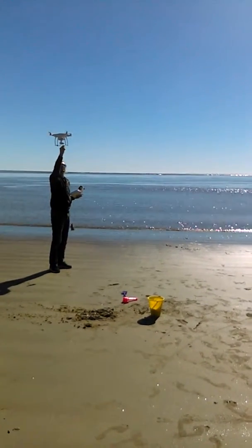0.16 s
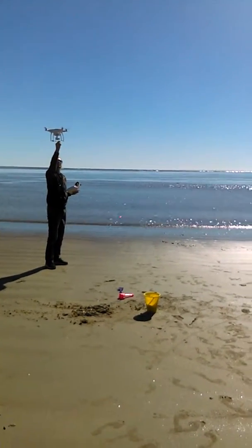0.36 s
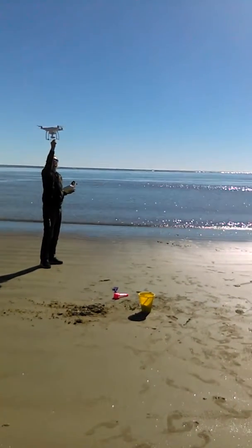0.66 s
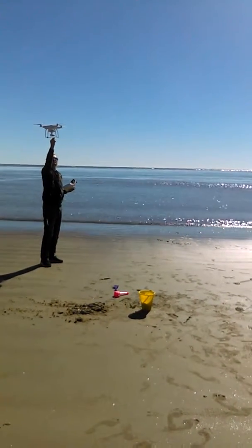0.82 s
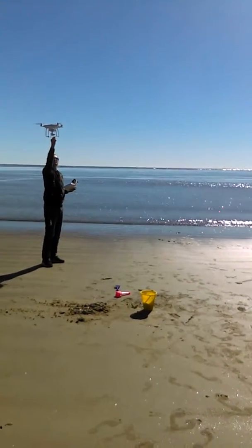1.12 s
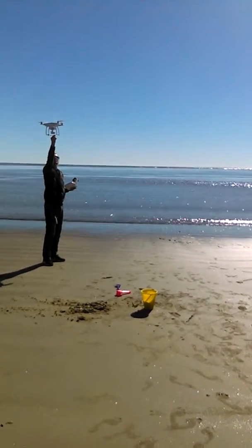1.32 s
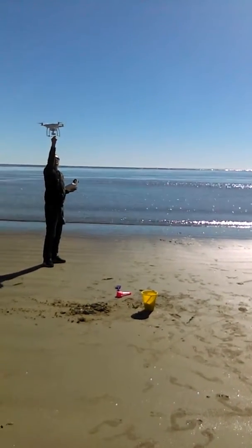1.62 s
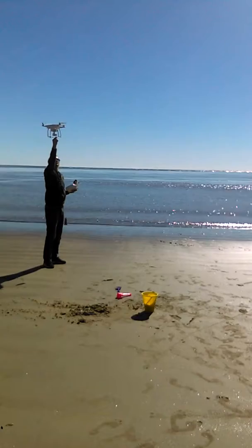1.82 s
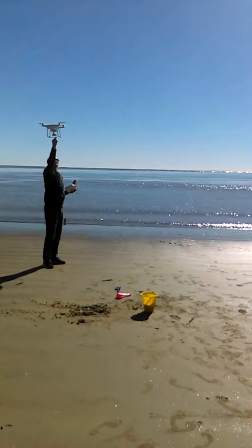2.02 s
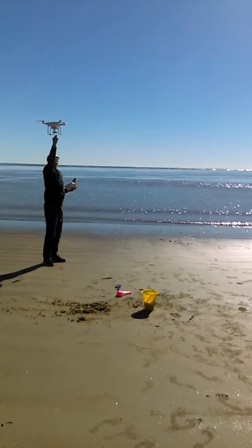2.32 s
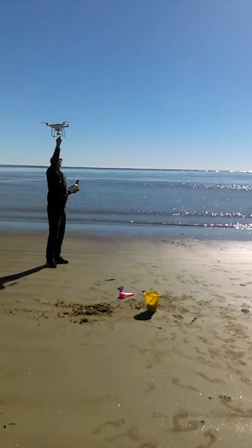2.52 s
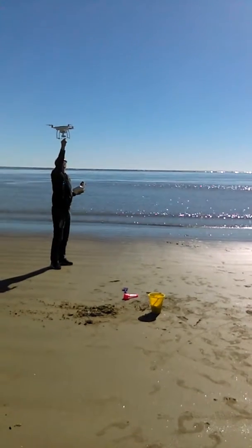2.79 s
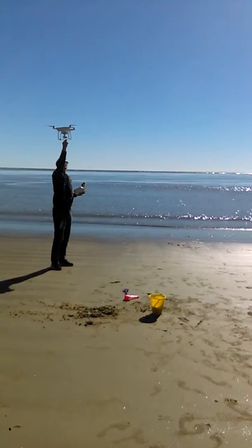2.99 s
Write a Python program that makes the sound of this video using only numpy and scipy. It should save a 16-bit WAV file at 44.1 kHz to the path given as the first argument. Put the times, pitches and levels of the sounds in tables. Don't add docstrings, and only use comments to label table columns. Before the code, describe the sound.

A small drone hovers a few metres away, its rotors buzzing with a thin high whine and airy hiss, while wind thumps the left side of the microphone, lulls midway, then gusts again on an open beach.

```python
import sys
import numpy as np
from scipy import signal
from scipy.fft import rfft, irfft, next_fast_len
from scipy.io import wavfile
from scipy.ndimage import uniform_filter1d, map_coordinates

SR = 44100
rng = np.random.default_rng(int(sys.argv[2]) if len(sys.argv) > 2 else 0)


def wav_out(sig):
    wavfile.write(sys.argv[1], SR, np.round(np.clip(np.atleast_2d(sig).T, -1, 1) * 32767).astype(np.int16))


def gain_from_db(level_db):
    decades = np.asarray(level_db, float) / 20
    return 10 ** decades


N = 138915


def unit(x):
    return x / np.sqrt(np.mean(x ** 2) + 1e-20)


def along(points, hz):
    f, v = np.transpose(points)
    return np.interp(np.log(hz + 1), np.log(f + 1), v)


def curves(rows):
    s, *cols = np.transpose(rows)
    return [np.interp(np.arange(N) / SR, s, c) for c in cols]


def wobble(rate):
    return map_coordinates(rng.standard_normal(400), [np.arange(N) * rate / SR])


def filtered(x, response):
    m = next_fast_len(N + SR // 2)
    return irfft(rfft(x, m) * response(np.fft.rfftfreq(m, 1 / SR)), m)[..., :N]


def resonance(hz, centre_hz, width_hz, db):
    return db / (1 + (2 * (hz - centre_hz) / width_hz) ** 2)


def bumps(s, size, width_s):
    k = np.arange(-800, 800)
    at = np.clip(np.round(s * SR).astype(int)[:, None] + k, -1, N) % (N + 1)
    bells = size[:, None] * np.exp(-(k / SR / width_s[:, None]) ** 2)
    return np.bincount(at.ravel(), bells.ravel(), N + 1)[:N]


def port(x):
    port_hz, q = 87.5, 0.99
    return filtered(x, lambda f: -f * f / (port_hz ** 2 - f * f + 1j * f * port_hz / q))


def eddies():
    # (frequency [Hz], level [dB])
    rumble_colour = [(15, -45), (45, 4), (110, 1.5), (250, -15), (600, -48.5)]
    eddies_per_s, typical_s, spread, smallest_s = 260, 0.0021, 1, 0.0008
    scatter_db, rumble_db = 0.5, 1.5
    u, g = rng.random((2000, 3)), rng.standard_normal(2000)
    s = np.cumsum(-np.log(1 - u[:, 0])) / eddies_per_s
    size = np.sign(u[:, 1] - .5) * gain_from_db(-scatter_db * np.log(1 - u[:, 2])) * (s < N / SR)
    width_s = np.maximum(typical_s * np.exp(spread * g), smallest_s)
    rumble = unit(filtered(rng.standard_normal(N), lambda f: gain_from_db(along(rumble_colour, f))))
    return unit(unit(port(bumps(s, size, width_s))) + gain_from_db(rumble_db) * rumble)


def strong_eddies(events):
    s, db, width_s, sign = np.transpose(events)
    return port(bumps(s, gain_from_db(db) * sign, width_s))


def wind():
    # (time [s], strength [dB])
    strength = [(0, -30), (.2, -30.5), (.35, -23.5), (.5, -26), (.65, -30), (.9, -24), (1.15, -29),
                (1.4, -26.5), (1.55, -31.5), (1.63, -41), (1.97, -42.5), (2.12, -29), (2.25, -35.5),
                (2.3, -17), (2.45, -29), (2.65, -31), (2.85, -26.5), (3.15, -37.5)]
    # (time [s], peak [dB])
    puff_events = [(.16, -27), (.185, -30.5), (.278, -25), (0.389, -30), (0.421, -19), (.476, -22),
                   (.506, -25.5), (0.576, -26), (0.719, -30), (0.779, -20.5), (0.823, -28), (0.97, -25),
                   (1.035, -29.5), (1.097, -25), (1.145, -26.5), (1.254, -32.5), (1.284, -27),
                   (1.427, -27.5), (1.444, -29), (1.523, -21.5), (1.6, -30.5), (2.417, -23.5), (2.47, -25),
                   (2.61, -28), (2.662, -29.5), (2.805, -25.5), (2.879, -33), (3.072, -30)]
    # (time [s], peak [dB], width [s], sign)
    thumps = [(0.118, -13, 0.00093, -0.93), (0.325, -11, 0.00081, -1.1), (0.469, -6, 0.00059, -0.74),
              (0.51, -17.5, 0.0025, 0.8), (.531, -19, 0.00063, -1.4), (0.59, -10.5, 0.0015, 0.96),
              (0.693, -14, 0.00076, -1.08), (0.916, -12, 0.00098, -1.45), (1.09, -13, 0.00082, -1.65),
              (1.351, -12, 0.00091, 1), (2.29, -4.5, 0.0032, 0.8), (2.317, -15, 0.00077, 0.78),
              (2.337, -14, 0.0011, 0.85), (2.351, -8, 0.0025, -0.77), (2.518, -16, 0.0012, -1.4),
              (2.754, -9, 0.0016, 0.69), (2.938, -13, 0.0017, 1)]
    # (time [s], peak [dB], width [s], sign)
    strays = [
        (2.002, -15.5, 0.0016, 1),
        (2.008, -16, 0.0023, 0.9),
        (2.014, -11.5, 0.0038, 1),
        (2.023, -12.5, 0.0028, 1),
        (2.15, -18.5, 0.0035, -1),
        (2.173, -19, 0.0021, -1.1),
        (2.186, -9, 0.0023, -0.91),
        (2.194, -15, 0.0012, -0.38),
        (2.204, -7.5, 0.0024, 0.64),
    ]
    between_db, gusty_db, puff_half_s = -2.5, 1, .007
    lee_db, lee_grows, lee_hz = -52.5, 0.094, 189
    strength_db, = curves(strength)
    s, db = np.transpose(puff_events)
    puffs = bumps(s, gain_from_db(db), np.full(len(s), puff_half_s))
    left = (gain_from_db(strength_db + between_db + gusty_db * wobble(15)) + puffs) * eddies()
    lee_level = lee_db + lee_grows * (strength_db - strength_db.mean()) + 5.1 * wobble(18)
    right = gain_from_db(lee_level) * filtered(eddies(), lambda f: 1 / (1 + 1j * f / lee_hz) ** 2)
    return np.array([left + strong_eddies(thumps), right + strong_eddies(strays)])


def tip_hiss(chop):
    # (frequency [Hz], level [dB])
    tip_colour = [(250, -28.5), (570, -21.5), (1100, -21.5), (1450, -25), (2400, -20), (4100, -29.5),
                  (10600, -22), (15500, -44.5)]
    # (frequency [Hz], left over right [dB])
    balance = [(60, 42.5), (110, 41), (200, -33), (420, 12), (700, -7), (1290, 10), (2380, -2), (4400, 6.5),
               (8120, -3), (15000, -19.5)]
    # (frequency [Hz], left lead [rad])
    phase_leads = [(0, -7), (3530, 3.5), (5430, -4), (6900, -18.5), (7650, -22), (9130, -25.5), (9910, -43),
                   (12500, -42.5), (13300, -68), (15200, -84)]
    # (frequency [Hz], share common to both ports)
    common = [(300, 0.72), (2000, 0.068), (6000, 0.2), (14000, 0.63)]
    # (frequency [Hz], width [Hz], gain [dB])
    shell = [
        (3760, 210, 3.5),
        (4090, 125, -8),
        (5340, 160, 7),
        (5574, 120, 10.5),
        (5824, 75, 12),
        (6870, 220, -5.5),
    ]
    hiss_db, chop_depth, patchy_db = -45, 0.043, 1
    z = signal.stft(rng.standard_normal((3, N)), nperseg=512)[2]
    patches = uniform_filter1d(rng.standard_normal(z.shape[1:]), 8, 0)
    patches = unit(uniform_filter1d(patches, 12, 1))
    air = signal.istft(z * gain_from_db(patchy_db * patches), nperseg=512)[1][:, :N]
    air = air * (1 + chop_depth * chop)

    def colour(f):
        ring_db = sum(resonance(f, *mode) for mode in shell)
        return gain_from_db(ring_db + along(tip_colour, f) + along(balance, f) * [[.5], [-.5]])

    def alike(f):
        return np.clip(along(common, f), 0, 1)

    def shared_path(f):
        return colour(f) * np.sqrt(alike(f)) * np.exp(1j * along(phase_leads, f) * [[.5], [-.5]])

    shared = filtered(air[0], shared_path)
    separate = filtered(air[1:], lambda f: colour(f) * np.sqrt(1 - alike(f)))
    return gain_from_db(hiss_db) * unit(shared + separate)


def motor_whine(i, hz, turn, speeding_up, push_db):
    # (multiple of the blade rate, left over right [dB], levels of rotors 1-4 [dB])
    whines = [
        (21.08, 4.5, [-62, -54.5, -64.5, -57.5]),
        (35, 5.5, [-52.5, -61.5, -59, -60]),
        (55, -2, [-75, -52, -74, -70]),
    ]
    # (frequency [Hz], gain [dB])
    frame = [(3200, -7), (3400, 1), (3500, 0), (3625, 3), (3680, -9), (3900, -16)]
    # (frequency [Hz], gain [dB])
    arms = [(5300, 3), (5378, 10), (5440, -3), (5530, -12), (5645, 4), (5720, -8), (5800, -6), (5900, -18)]
    # (time [s], level [dB])
    looseness = [(0, -13), (.2, -10), (.3, -4), (.45, -13), (.72, -9), (.82, 6.5), (1.05, 7), (1.19, 0),
                 (1.24, 4.5), (1.36, 0.5), (1.48, 7.5), (1.58, -2), (1.72, 0), (1.9, 3), (2.4, 5),
                 (2.75, 3), (2.9, 3.5), (3.15, 3.5)]
    push_most_db, smear_rad = 1.5, .25
    loose_db, = curves(looseness)
    pushed_db = np.clip(push_db, -push_most_db, push_most_db) * speeding_up
    whine = np.zeros((2, N))
    for order, pan_db, rotor_db in whines:
        order = round(order)
        whine_db = rotor_db[i] + along(frame + arms, order * hz) + pushed_db + 2.24 * wobble(12.01)
        whine_db = whine_db + (order * hz > frame[-1][0]) * loose_db
        whine += gain_from_db(whine_db + pan_db * np.c_[[.5, -.5]]) * np.sin(order * turn + smear_rad * wobble(90))
    return whine


def blade_hum(hz, turn, hum_db):
    # (multiple of the blade rate, left [dB], right [dB], lean [dB per Hz above the middle rate])
    blades = [(1, -60, -61, -0.33), (2, -50.5, -52.5, 0.3647), (3, -52.5, -63, -0.64),
              (4, -62, -50.5, 0.27), (5, -62.5, -59.5, -0.14), (6, -62.5, -61, 0.63), (7, -58, -59.5, -0.5),
              (8, -72, -64, 0.09), (9, -82, -76, 1.31), (10, -66, -90, 0.63), (11, -64.5, -67, -0.18),
              (12, -70, -69.5, -0.02), (14, -68, -70, -0.12)]
    # (frequency [Hz], width [Hz], gain [dB])
    hull = (337, 33, 4.6)
    middle_hz, flutter_db = 166, 2
    hum = np.zeros((2, N))
    for k, left_db, right_db, lean_db in blades:
        k = round(k)
        tone_db = hum_db + resonance(k * hz, *hull) + lean_db * (hz - middle_hz) + flutter_db * wobble(8.99)
        hum += gain_from_db(tone_db + np.c_[[left_db, right_db]]) * np.sin(k * turn + rng.uniform(0, 7.68))
    return hum


def rotor_speeds():
    # (time [s], blade rates of rotors 1-4 [Hz], depth of the hunting [Hz])
    rotor_rates = [(0, 160, 164, 168, 174, 2.5), (.1, 160, 165, 168, 171.5, 3),
                   (.33, 155.2, 165, 169, 175, 1.5), (.45, 159, 165, 168, 175.5, 2),
                   (.7, 160, 167, 169, 173, 2.5), (.9, 156, 166.5, 169, 172, 2),
                   (1.17, 156, 167, 169, 172, 1.5), (1.38, 153.4, 169.5, 171, 177, 1.2),
                   (1.57, 155.3, 167, 171, 176, 1.2), (1.73, 153.6, 167.5, 169, 175.5, 1.5),
                   (1.78, 160, 170, 170, 177.5, 2), (1.83, 159.5, 162, 165.5, 176.5, 4.6),
                   (2.2, 157.5, 165, 168, 176, 3), (2.5, 158, 165.5, 169, 174, 1.6),
                   (2.78, 155.8, 165.5, 170, 175.5, 1.1), (2.84, 158.2, 164, 170, 173, 5),
                   (3, 158, 165, 170, 174, 4.8), (3.15, 157, 168, 170, 176, 4)]
    # (share of the hunting, its growth with depth, level [dB], push [dB per Hz of speeding up], left lead [s])
    seats = [(0.1, 2.2, -2, -1, 0.000038), (0.92, 0.876, 3, 1.5, 0.000085), (0.51, 1.4, -2, 1, 0.0001),
             (0.28, 1.75, -1, -2.5, 0.000068)]
    # (time [s], hunting rate [Hz])
    hunt_rate = [(0, 12.3), (2.7, 12.3), (2.71, 7.8), (2.82, 7.8), (2.84, 10.7), (2.96, 10.7), (2.98, 5),
                 (3.06, 5), (3.08, 10)]
    hunt_leads = [.33, 0, 0, 0]
    hunt_start_turns, drift_hz = -0.2635, 0.2595
    *rates, depth = curves(rotor_rates)
    hunt = 2 * np.pi * (np.cumsum(curves(hunt_rate)[0]) / SR + hunt_start_turns)
    rotors = []
    for rate, seat, lead_turns in zip(rates, seats, hunt_leads):
        share, growth, hum_db, push_db, lead_s = seat
        swing = hunt + 2 * np.pi * lead_turns
        hz = rate + share * depth ** growth * np.sin(swing) + drift_hz * wobble(25.07)
        turn = 2 * np.pi * (np.cumsum(hz) / SR + lead_s * hz * [[.5], [-.5]])
        rotors.append((hz, turn, depth * np.cos(swing), hum_db, push_db))
    return rotors


def drone():
    tones, chop = np.zeros((2, N)), 0
    for i, (hz, turn, speeding_up, hum_db, push_db) in enumerate(rotor_speeds()):
        tones += blade_hum(hz, turn, hum_db)
        tones += motor_whine(i, hz, turn, speeding_up, push_db)
        chop = chop + np.cos(turn[0])
    return tones + tip_hiss(chop)


def scene():
    return wind() + drone()


def low_pass(x):
    return signal.sosfilt(signal.butter(12, 15710, fs=SR, output="sos"), x)


def record(dry):
    cut_hz, top_hz = 15.6, 15720
    mix = filtered(dry, lambda f: (f < top_hz) * 1j * f / (cut_hz + 1j * f))
    return low_pass(mix)


dry = scene()
out = record(dry)
wav_out(out)
```